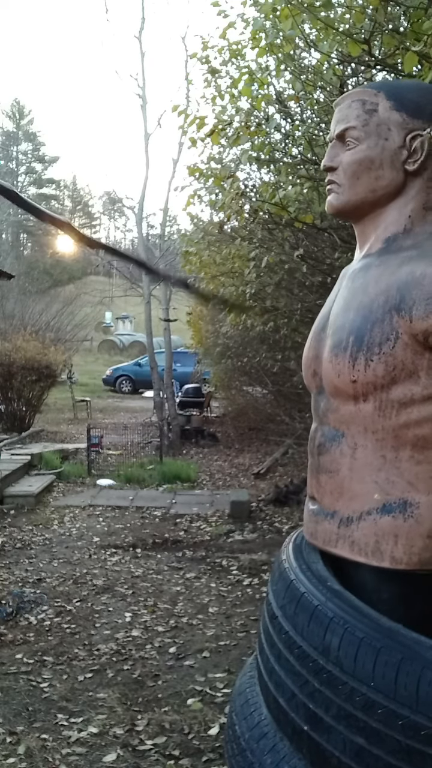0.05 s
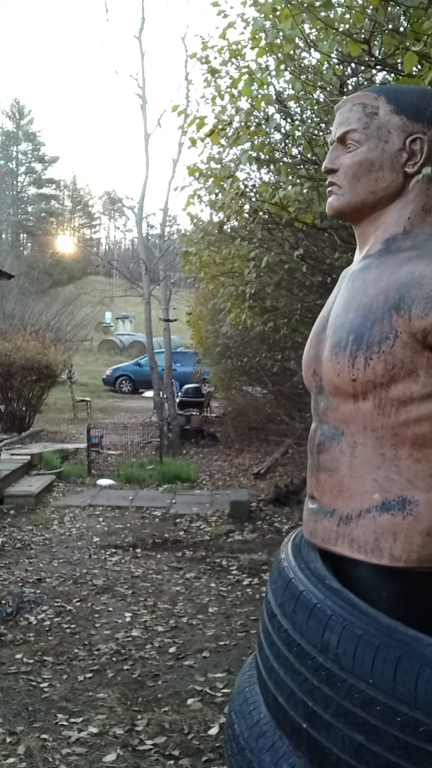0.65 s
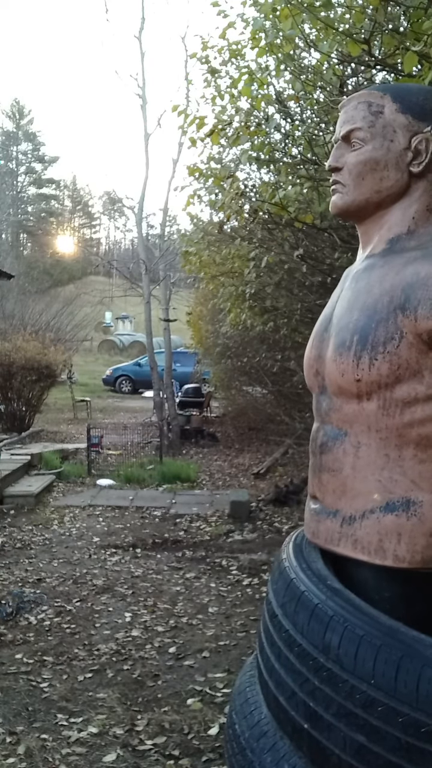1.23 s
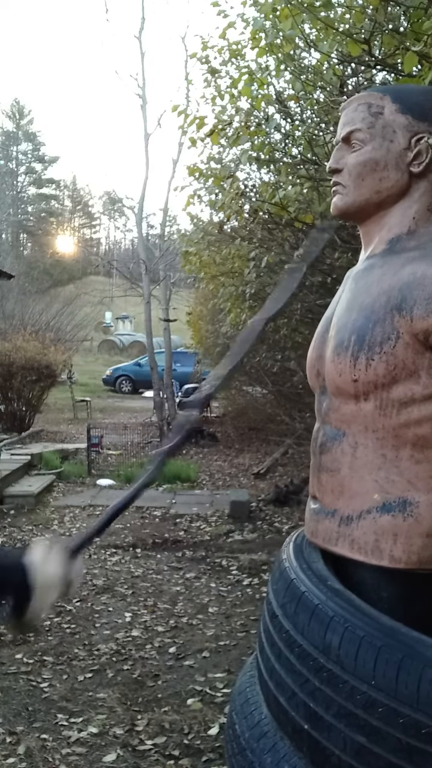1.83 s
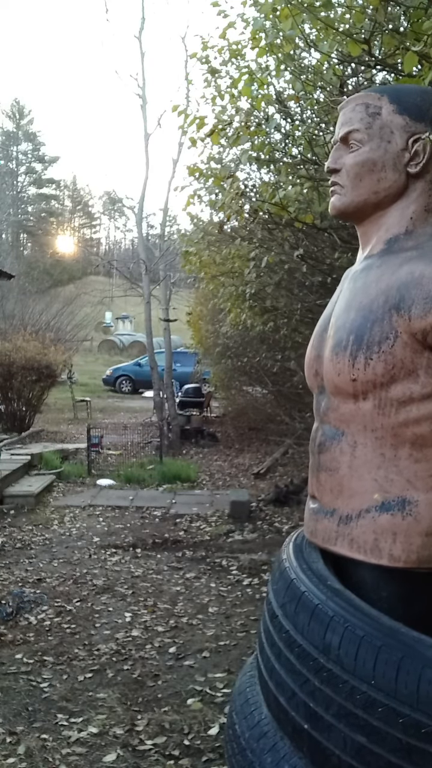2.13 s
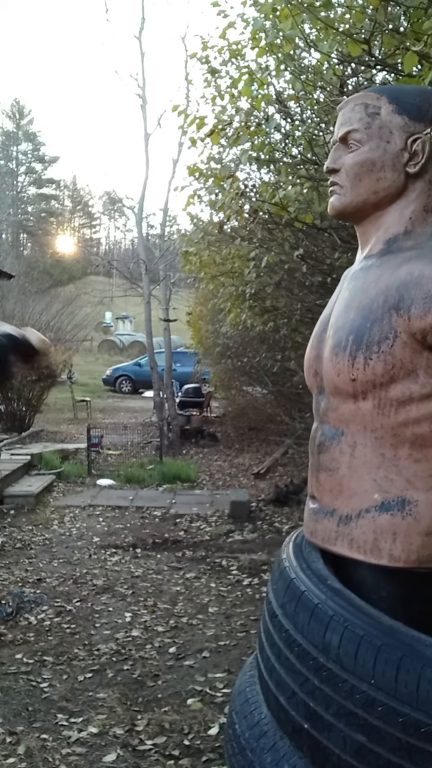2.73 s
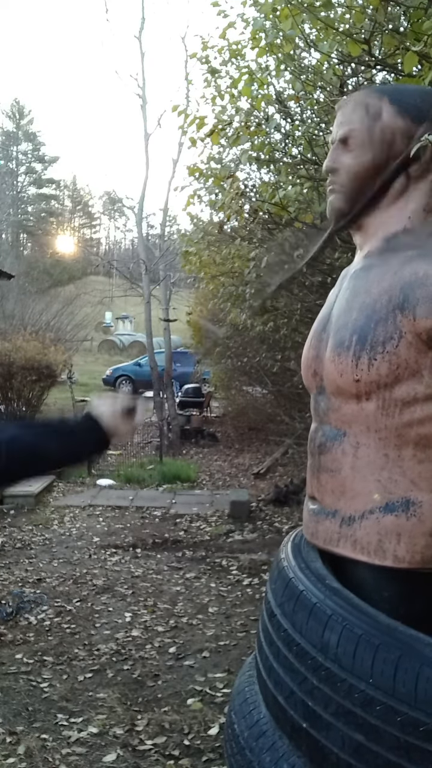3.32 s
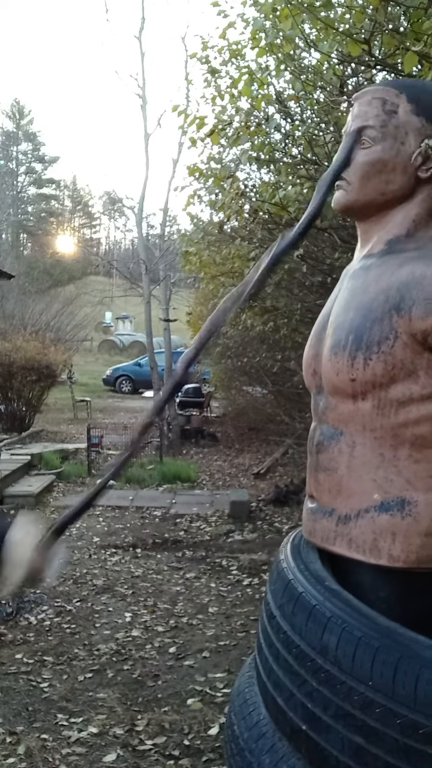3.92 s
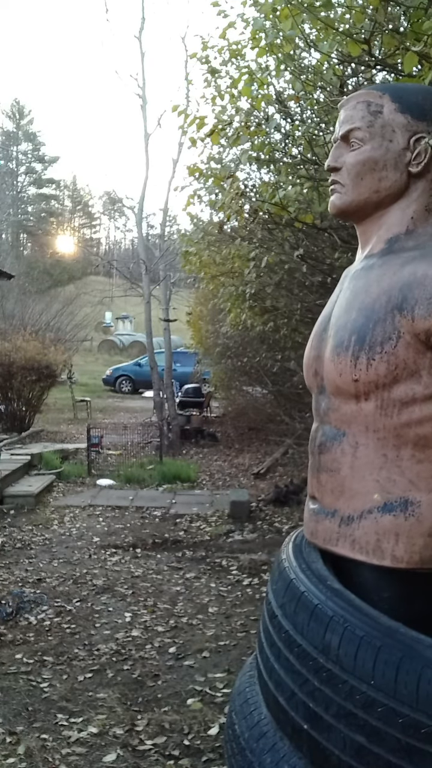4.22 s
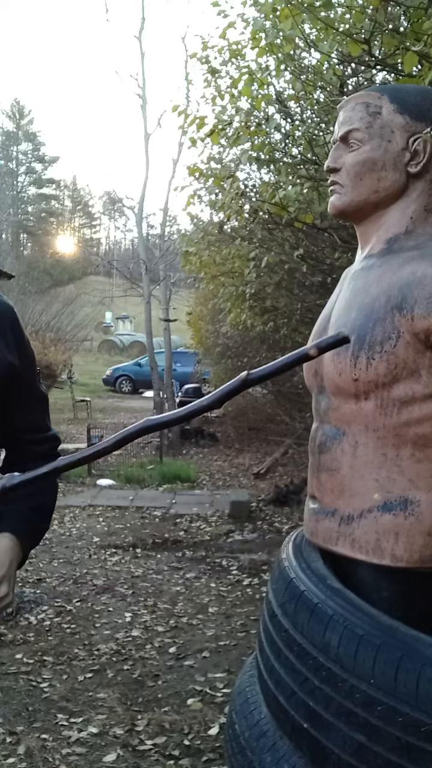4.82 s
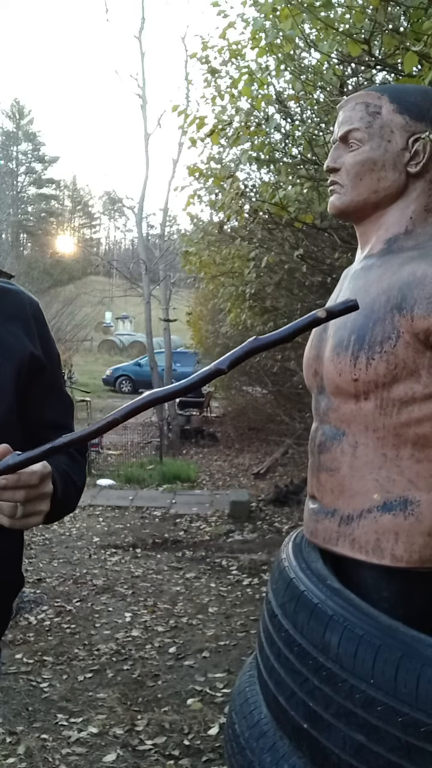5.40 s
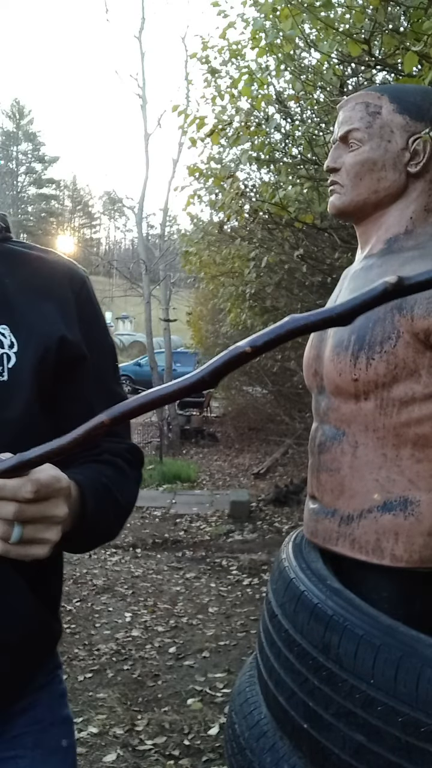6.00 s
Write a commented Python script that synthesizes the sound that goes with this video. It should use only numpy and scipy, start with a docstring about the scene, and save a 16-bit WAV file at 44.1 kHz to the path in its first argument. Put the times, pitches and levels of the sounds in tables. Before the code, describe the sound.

A wooden stick strikes a hollow rubber dummy nine times outdoors with sharp cracks and thumps, then faint footsteps and jacket rustle.

```python
"""A wooden stick strikes a hollow rubber dummy in a yard, nine times in the first four seconds.
Each swing hums, cracks on the rubber skin and thumps the torso; walls and trees throw the crack back.
Between blows the stick ticks lightly, feet shift in dry leaves and a jacket rustles.
In the last two seconds only feet and jacket move, over faint open air and a far drone."""
import sys
import numpy as np
from scipy import signal
from scipy.fft import rfft, irfft, next_fast_len
from scipy.io import wavfile
from scipy.ndimage import uniform_filter1d, map_coordinates

SR = 44100
rng = np.random.default_rng(int(sys.argv[2]) if len(sys.argv) > 2 else 0)


def master_out(mix):
    """Clip the mix to full scale and print it as 16-bit PCM to the path in sys.argv[1]."""
    frames = np.transpose(np.atleast_2d(mix))
    ceiling = np.clip(frames, -1, 1)
    pcm = np.round(ceiling * 32767).astype(np.int16)
    wavfile.write(sys.argv[1], SR, pcm)


N = 271215
T = np.arange(int(.55 * SR)) / SR  # time within one event [s]
TOP_HZ = 15700

# Full blows, levels relative within a column: (time [s], hum [dB], crack [dB], slap [dB], slap pitch [Hz],
# thump [dB], torso ring [dB], scatter [dB], woodiness [dB], brightness [dB], bite [Hz])
BLOW_EVENTS = [ (-.012, -42.5, -11.5, -22.5, 476, -16, -23.5, -37.5, -0.5, -1.5, 3900),
               (0.4227, -35, -9.5, -24, 302, -20, -15.5, -29.5, 4, 0.5, 4300),
               (.8962, -46.5, -12.5, -27, 393, -28.5, -18.5, -28, 6, -3, 5300),
               (1.3837, -39.5, -10.5, -19, 262, -23, -15, -27.5, 3.5, 3.5, 6850),
               (1.8425, -51, -12.5, -24.5, 170.2, -16, -16, -34, 2, -3, 5700),
               (2.3348, -34, -9, -18, 490, -13, -14.5, -30.5, 0, 2.5, 5530),
               (2.8334, -45, -17, -28, 375, -33, -24, -25, 0, -3, 4310),
               (3.3368, -40.5, -8.5, -20.5, 353, -22.5, -16, -31, -6.5, -7.5, 5900),
               (3.9131, -55, -11, -35.5, 329, -48, -27.5, -32.5, 1, 2, 7100)]
# Rubber slap: (frequency [Hz], level [dB])
SLAP_SPECTRUM = [(60, -10.5), (170, 2), (300, -6.5), (550, -7.5), (800, -13.5), (1500, -16), (5000, -54)]
# A stick that sinks in deep damps the wall: (thump [dB], slap t60 [s])
WALL_DAMPING = [(-25, .33), (-22.5, 0.093)]

def blows(left_db=5.5):
    """The stick cracks on the skin; the rubber wall shudders and dents, then the torso rings."""
    cracks, body, yard = np.zeros((3, 2, N))
    for (s, _, crack_db, slap_db, slap_hz, thump_db, ring_db, scatter_db,
         wood_db, bright_db, bite_hz) in BLOW_EVENTS:
        colour = contact_colour(wood_db, bite_hz, bite_db=1)
        add(cracks, s, amp(crack_db + 6) * crack(colour, bright_db) * pan(left_db))
        slap_t60 = np.interp(thump_db, *np.transpose(WALL_DAMPING))
        shudder = fade(.028, .00041) + amp(-10.5) * fade(slap_t60, .0033) + amp(-18) * fade(.4, .018)
        slap = noise(shaded(SLAP_SPECTRUM, slap_hz, db=7.5, octaves=.36), len(T), mono_hz=600)
        add(body, s, amp(slap_db + 9) * slap * shudder)
        dent_hz = 58 + 125 * np.exp(-T / .0075)  # springs back more slowly as the stick sinks in
        thump = np.sin(2 * np.pi * np.cumsum(dent_hz) / SR) * fade(.07, .0015)
        add(body, s + .00061, amp(thump_db + 9) * thump + torso(ring_db, slap_db + 7.5, slap_hz))
        add(yard, s, amp(scatter_db + 7.5) * scatter(colour, bright_db) * pan(2.805))
    return cracks + echoes(cracks) + body * pan(-.54) + yard


# Wood on rubber skin: (frequency [Hz], level [dB])
CRACK_SPECTRUM = [(60, -20.5), (250, -12.5), (850, -15.5), (1800, -7), (2400, -10), (3300, -10.5),
                  (4300, -8), (5300, -2), (6200, -3), (7000, -3.5), (8000, -5.5), (9500, -10),
                  (12500, -9.5), (15500, -12.5)]

def crack(colour, bright_db, contact_s=.0014):
    """Wood smacks the rubber skin for a few milliseconds."""
    smack = np.exp(-(T / contact_s) ** .75) * (1 - np.exp(-T / .00008))
    return noise(tinted(CRACK_SPECTRUM, colour), len(T), bright_db, mono_hz=3960) * smack


# Stick bending modes, damped by hand and rubber: (frequency [Hz], lift [dB])
STICK_MODES = [(960, 3), (1400, -1.5), (1800, 2), (2560, 3), (2980, 2.5), (3755, 2), (4170, 2.5),
               (4530, 3.5), (5300, 3), (7080, 3.5), (8500, 3.5), (11650, 1.5)]

def contact_colour(wood_db, bite_hz, bite_db, half_width_hz=60, ripple_db=1.2):
    """Stick modes, skin bite and random ripple colour a contact: (frequency [Hz], gain [dB])."""
    hz = np.arange(30, 16000, 20)
    modes = sum(db / (1 + ((hz - mode_hz) / half_width_hz) ** 2) for mode_hz, db in STICK_MODES)
    ripple = ripple_db * unit(uniform_filter1d(rng.standard_normal(len(hz)), size=9))
    wood = wood_db * hump(hz, 1400, .69)
    bite = bite_db * hump(hz, bite_hz, .45)
    return np.transpose([hz, modes + ripple + wood + bite])


# Hollow torso: (frequency [Hz], level [dB], t60 [s])
TORSO_MODES = [(53, -4.5, 0.32), (81, -7, 0.39), (109.93, 0, 0.32), (167, -5.5, .18), (210.4, -13.5, .16),
               (248, -12, 0.13), (278.8, -9, .17), (370.5, -14.5, 0.15), (416.2, -9, .13), (466, -15, 0.17),
               (553, -20, .27)]

def torso(ring_db, knock_db, spot_hz, spot_db=6.5, fill_s=.032):
    """Low cavity modes boom, upper wall modes knock; the struck spot favours those near its pitch."""
    out = np.zeros(len(T))
    knots = np.arange(0, T[-1], .045)
    for hz, db, t60 in TORSO_MODES:
        wall_share = np.clip(np.log2(hz / 120), 0, 1)
        level_db = db + (1 - wall_share) * ring_db + wall_share * knock_db
        level_db += spot_db * hump(hz, spot_hz, octaves=.23)
        # the rocking shell makes each mode swell and drift
        swell_db, drift = [np.interp(T, knots, k) for k in rng.standard_normal((2, len(knots)))]
        cycles = hz * (1 + .01 * rng.normal()) * T + wall_share * rng.random()
        cycles += .1 * drift * (1 - np.exp(-T / .03))
        out += amp(level_db + swell_db) * fade(t60, fill_s) * np.sin(2 * np.pi * cycles)
    return out


# Scattered crack: (frequency [Hz], level [dB])
SCATTER_SPECTRUM = [(100, -32), (400, -9), (1000, -3.5), (2000, -3.5), (2600, -2.5), (4000, 0),
                    (5100, -0.5), (6000, -1), (7200, 0), (8500, -2.5), (10000, -4.5), (12500, -1),
                    (15500, -11.5)]
# Yard decay: (frequency [Hz], t60 [s])
YARD_DECAY = [(150, .4), (700, 0.49), (2000, 0.48), (5000, 0.36), (9000, .33), (15000, 0.18)]

def scatter(colour, bright_db, near_t60=.2, far_db=-6):
    """Ground and bushes return a dense wash; far trees add a tail whose treble dies first."""
    spectrum = tinted(SCATTER_SPECTRUM, colour)
    near = noise(spectrum, len(T), bright_db) * fade(near_t60, .0022) * amp(1.3 * wobble(400, len(T)))
    hz, t, bins = signal.stft(noise(spectrum, len(T), bright_db / 2), SR, nperseg=256)
    # single trunks stand out in the midrange, foliage smooths the treble
    trunks = rng.exponential(size=len(t)).clip(0, 4) - 1
    grain_db = along([(1800, 2.3), (5000, .8)], hz)[:, None] * trunks * (1 - np.exp(-t / .05))
    decay_db = 60 * t / along(YARD_DECAY, hz)[:, None]
    _, far = signal.istft(bins * amp(grain_db - decay_db), SR, nperseg=256)
    return near + amp(far_db) * far[:, :len(T)] * (1 - np.exp(-T / .01))


# Walls and trunks: (delay [s], relative level [dB])
REFLECTORS = [(0.0217, -14), (0.0238, -12.5), (0.101, -25), (0.12, -32.5), (0.1440, -20.5), (.169, -31)]

def echoes(x):
    """Hard surfaces return copies, thin in the bass and duller the further they travel."""
    out = np.zeros((2, N))
    thin = signal.lfilter(*signal.butter(1, 350, "high", fs=SR), x)
    for delay_s, db in REFLECTORS:
        cutoff_hz = 4200 / (1 + 6 * delay_s)
        lowpass = signal.butter(1, cutoff_hz, fs=SR, output="sos")
        add(out, delay_s, amp(db + 5) * signal.sosfilt(np.vstack([lowpass, lowpass]), thin + 1e-20))
    return out


# Air pushed by the nearest blows: (time [s], relative level [dB])
PUFF_EVENTS = [(.4226, -23), (1.36, -39), (2.3365, -13.5)]

def puffs(sway_hz=50):
    """A gust presses on one microphone port and sucks at the other."""
    out = np.zeros((2, N))
    gust = np.sin(2 * np.pi * sway_hz * T) * fade(.092, .004) * np.array([[1], [-1]])
    for s, db in PUFF_EVENTS:
        add(out, s, amp(db + 8.5) * gust)
    return out


# Light stick contacts: (time [s], relative level [dB], brightness [dB])
TAP_EVENTS = [(0.184, -49.5, 8), (.2115, -48.5, -10.5), (0.4129, -21, 4.5), (0.415, -18, 4),
              (1.2655, -55, 3.5), (2.114, -22.5, 3.5), (2.193, -44.5, -9.5), (2.254, -45.5, -7.5),
              (3.921, -21, 0)]

def taps():
    """Glancing touches crack and echo without ringing the torso."""
    out = np.zeros((2, N))
    for s, db, bright_db in TAP_EVENTS:
        colour = contact_colour(wood_db=-1, bite_hz=3500, bite_db=2.4)
        tick = crack(colour, bright_db, contact_s=.0038)
        wash = scatter(colour, bright_db, near_t60=.033, far_db=-13)
        add(out, s, amp(db + 5.5) * (tick + amp(-11) * wash))
    return (out + echoes(out)) * pan(2.4)


def swings(peak_hz=277, glide_s=.13, swell_s=.0357, stop_s=.008, lead_s=.0085):
    """Vortices shed by the stick hum higher and louder as it speeds up, breathy at top speed."""
    out = np.zeros((2, N))
    t = T - .5  # zero at top speed, lead_s before the blow
    pitch_hz = peak_hz * np.exp(np.minimum(t, 0) / glide_s)
    tone = np.exp(2j * np.pi * np.cumsum(pitch_hz) / SR)
    speed = np.exp(-np.where(t < 0, (t / swell_s) ** 2, t / stop_s))
    for s, db, *_ in BLOW_EVENTS:
        eddies = wobble(110, len(T)) + 1j * wobble(110, len(T))
        hum = unit(np.real((1 + eddies) * tone))
        breath = amp(-10) * speed * noise(SLAP_SPECTRUM, len(T))
        add(out, s - lead_s - .5, amp(db) * speed * (hum + breath))
    return out


# Footfalls: (time [s], relative thud [dB], relative crunch [dB], crunch t60 [s])
FOOTFALLS = [(0.23, -88, -49, .25), (0.263, -64, -49, 0.13), (.752, -72, -42.5, .12),
             (0.768, -70, -39.5, 0.095), (1.341, -38, -48.5, 0.36), (1.685, -69.5, -44, .1),
             (2.637, -53.5, -51.5, .1), (2.737, -31, -42, 0.13), (3.702, -70, -45, 0.041),
             (4.571, -55.5, -63, 0.17), (5.3, -80, -82, .2), (5.848, -67, -69.5, 0.12),
             (6.118, -56, -50, 0.14)]
# Dry leaves: (frequency [Hz], level [dB])
LEAF_SPECTRUM = [(100, -32), (550, -12), (1000, -12), (2000, -7), (2500, 0.5), (3000, -3.5), (3900, 0.5),
                 (6000, -6.5), (9500, -13.5), (15500, -18.5)]

def steps():
    """A foot thuds on soil and crunches dry leaves, whose stalks snap in clumps."""
    out = np.zeros((2, N))
    soil_spectrum = [(30, -17.5), (70, 4), (115, -1.5), (200, -8.5), (300, -23), (900, -32), (4000, -52)]
    for s, thud_db, crunch_db, t60 in FOOTFALLS:
        thud = noise(soil_spectrum, len(T)) * fade(.12, .012)
        leaves = noise(LEAF_SPECTRUM, len(T))
        clumps = amp(3 * wobble(1000, len(T)) + 3.7 * wobble(130, len(T)))
        crunch = unit(leaves * clumps) * fade(t60, .0036)
        add(out, s, amp(thud_db + 8.5) * thud + amp(crunch_db + 2) * crunch)
    return out * pan(1.4)


# Jacket rustles and, at 3.703 s, the treble of a short, bright foot scuff in dry leaves:
# (peak time [s], level [dB], rise [s], fall [s])
RUSTLE_EVENTS = [(2.1, -56, .15, 0.24), (3.703, -38.5, .001, .022), (3.781, -53, 0.036, .03),
                 (4.178, -55.5, 0.034, 0.012), (4.87, -57.5, 0.025, 0.083), (5.19, -57.5, 0.13, .035),
                 (5.35, -58, 0.057, 0.03), (5.749, -57, .012, 0.042), (5.843, -47.5, 0.0084, 0.12),
                 (6.124, -46.5, 0.022, .04)]
# Cloth never quite at rest: (time [s], level [dB])
CLOTH_FLOOR = [(0, -67), (.65, -62), (1.18, -68), (1.6, -58.5), (1.8, -68.5), (2.65, -62.5), (3.15, -75.5),
               (4.05, -65.5), (4.65, -82), (6.15, -67.5)]
# Fine crackle: (frequency [Hz], level [dB])
RUSTLE_SPECTRUM = [(400, -22), (1000, -16), (1750, -14), (2400, -10.5), (3700, -4.5), (4900, -0.5),
                   (6800, -5.5), (9500, -7.5), (13000, -9.5), (16000, -16.5)]

def rustle(left_lag_s=.00036):
    """Jacket cloth crackles as arm and body move; the same crackle brightens one foot scuff in leaves."""
    t = np.arange(N) / SR
    sleeves = [(s, db - 9.5, .018, .05) for s, db, *_ in BLOW_EVENTS]
    power = amp(curve(CLOTH_FLOOR)) ** 2
    for s, db, rise_s, fall_s in RUSTLE_EVENTS + sleeves:
        swell = np.exp(-np.maximum((s - t) / rise_s, (t - s) / fall_s))
        power += (amp(db) * swell) ** 2
    grain = amp(2.4 * wobble(600, N) + 1.1 * wobble(40, N))
    crackle = np.sqrt(power) * unit(noise(RUSTLE_SPECTRUM, N, mono_hz=8700) * grain) * pan(7.7)
    return filtered(crackle, lambda hz: np.exp(-2j * np.pi * hz * np.array([[left_lag_s], [0]])))


# Open air: (frequency [Hz], level [dB])
AIR_SPECTRUM = [(15, -36), (25, -7), (76, 8.5), (180, -5), (242, -7.5), (416, -15), (2050, -27),
                (2350, -27), (3620, -31), (4610, -22), (7110, -19.5), (9840, -27), (12200, -25.5),
                (14800, -21.5), (16000, -29.5)]

def outdoors():
    """Faint open air; a far drone on the left sinks, then grows toward the end."""
    drone = noise([(170, -36.5), (225, -3.5), (255, .5), (290, -12), (360, -28.5), (1000, -67.5)], N)
    drone_db = curve([(0, -70), (4.5, -76.5), (6.15, -67)])
    air = amp(-67 + wobble(10, N)) * noise(AIR_SPECTRUM, N, mono_hz=450)
    return air * pan(4.4) + amp(drone_db) * drone * pan(4.9)


def amp(db):
    return 10 ** (np.asarray(db) / 20)


def unit(x):
    return x / np.sqrt(np.mean(x ** 2) + 1e-20)


def pan(left_db):
    return amp([[left_db / 2], [-left_db / 2]])


def fade(t60, attack_s):
    """A rise, then an exponential decay."""
    return 10 ** (-3 * T / t60) * (1 - np.exp(-T / attack_s))


def curve(rows):
    """One value per sample from (time [s], value) rows."""
    return np.interp(np.arange(N) / SR, *np.transpose(rows))


def wobble(rate_hz, size):
    """Smooth random curve, rate_hz knots a second."""
    knots = rng.standard_normal(int(size * rate_hz / SR) + 4)
    return map_coordinates(knots, [np.arange(size) * rate_hz / SR])


def along(points, hz):
    """Interpolate (frequency [Hz], value) points on a log axis."""
    knots_hz, values = np.transpose(points)
    return np.interp(np.log(hz + 1), np.log(knots_hz), values)


def hump(hz, centre_hz, octaves):
    """A bell on a log-frequency axis."""
    return np.exp(-.5 * (np.log2((hz + 1) / centre_hz) / octaves) ** 2)


def shaded(spectrum, centre_hz, db, octaves):
    """A spectrum with one region raised by db."""
    hz = np.geomspace(30, 16000, 900)
    return np.transpose([hz, along(spectrum, hz) + db * hump(hz, centre_hz, octaves)])


def tinted(spectrum, colour):
    """A spectrum plus a contact colour."""
    hz, db = colour.T
    return np.transpose([hz, along(spectrum, hz) + db])


def filtered(x, gain):
    """Apply a frequency-dependent gain."""
    size = x.shape[-1]
    padded = next_fast_len(size + 8192)
    return irfft(rfft(x, padded) * gain(np.fft.rfftfreq(padded, 1 / SR)), padded)[..., :size]


def noise(spectrum, size, bright_db=0, mono_hz=700):
    """Stereo noise of rms 1: channels alike in the bass, unrelated in the treble."""
    def mid_side_gain(hz):
        tilt_db = bright_db * along([(5500, .073), (11000, .93)], hz)
        width = np.sqrt((hz ** 2 + 170 ** 2) / (hz ** 2 + mono_hz ** 2))
        return amp(along(spectrum, hz) + tilt_db) * np.array([np.ones_like(hz), width])
    mid, side = filtered(rng.standard_normal((2, size)), mid_side_gain)
    return unit(np.array([mid + side, mid - side]))


def add(out, s, x):
    """Mix x into out from time s."""
    start = round(s * SR)
    x = x[..., max(0, -start):max(0, N - start)]
    out[:, max(0, start):][:, :x.shape[-1]] += x


def scene():
    return blows() + puffs() + taps() + swings() + steps() + rustle() + outdoors()


# Microphone port balance: (frequency [Hz], left minus right [dB])
PORT_BALANCE = [(60, -3), (400, 2), (800, 1), (2400, 3), (8000, -2.5), (11000, 1.5), (14500, 6.5)]

def record(dry, ceiling=.92):
    """Two ports colour the sound; the cracks clip near full scale; a steep low-pass ends the band."""
    heard = filtered(dry, lambda hz: amp(along(PORT_BALANCE, hz) * np.array([[.5], [-.5]])))
    clipped = heard / (1 + np.abs(heard / ceiling) ** 6) ** (1 / 6)
    return filtered(clipped, lambda hz: 1 / (1 + (hz / TOP_HZ) ** 100))


dry = scene()
out = record(dry)
master_out(out)
```